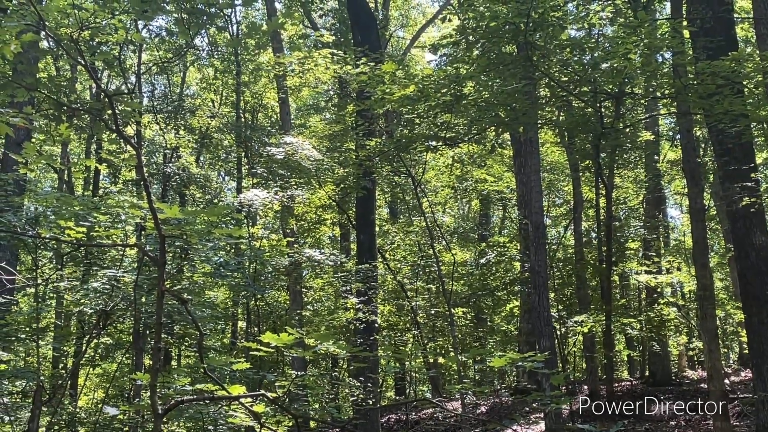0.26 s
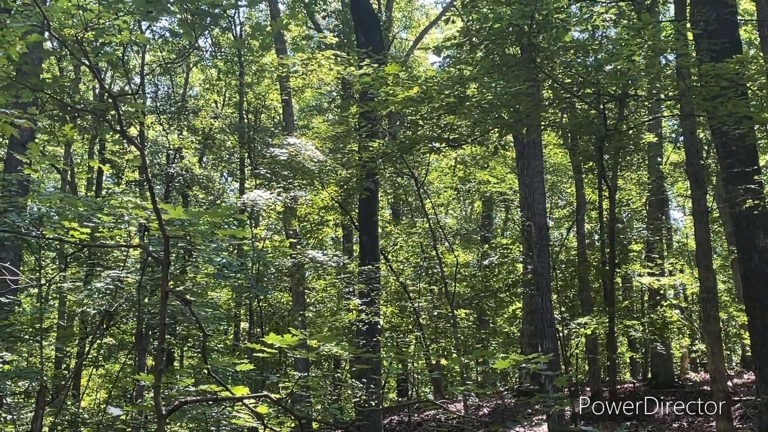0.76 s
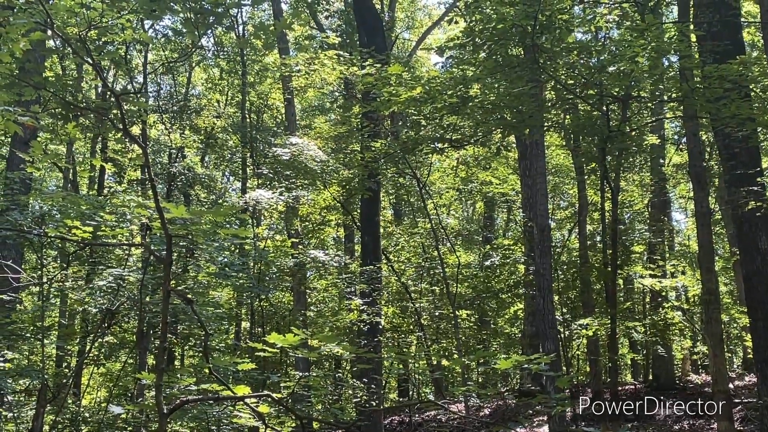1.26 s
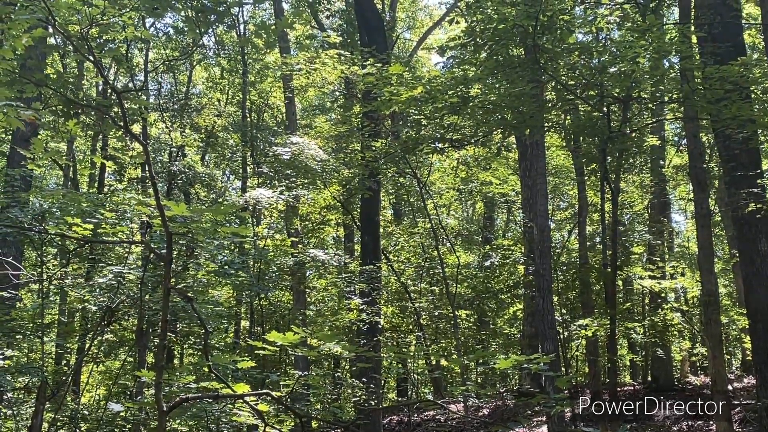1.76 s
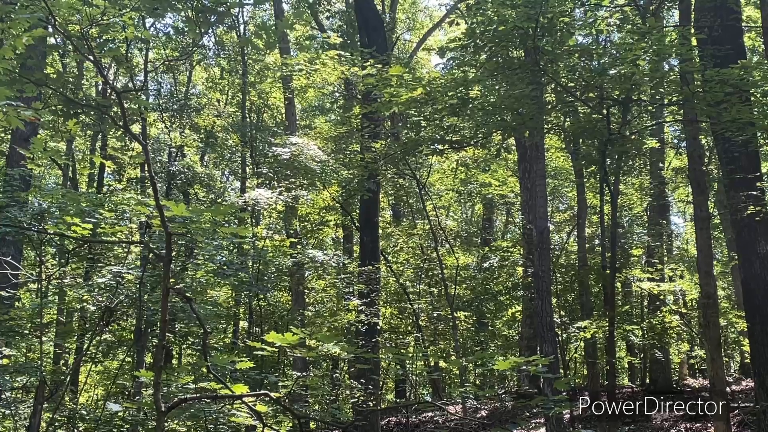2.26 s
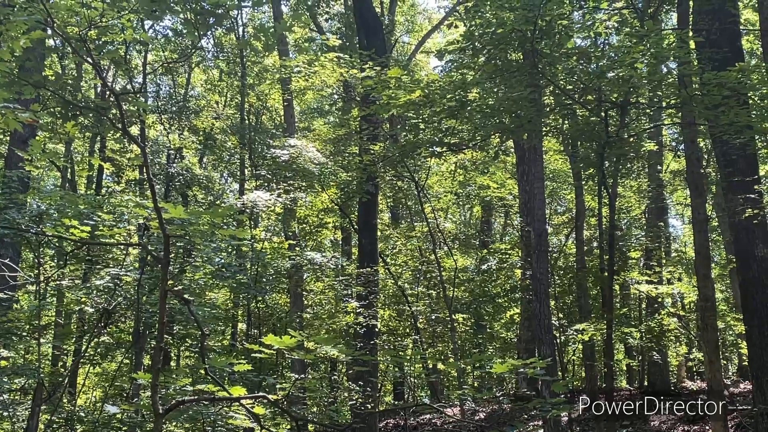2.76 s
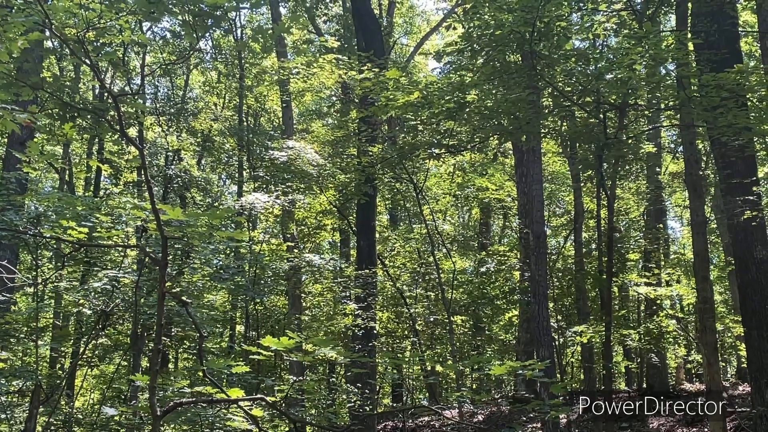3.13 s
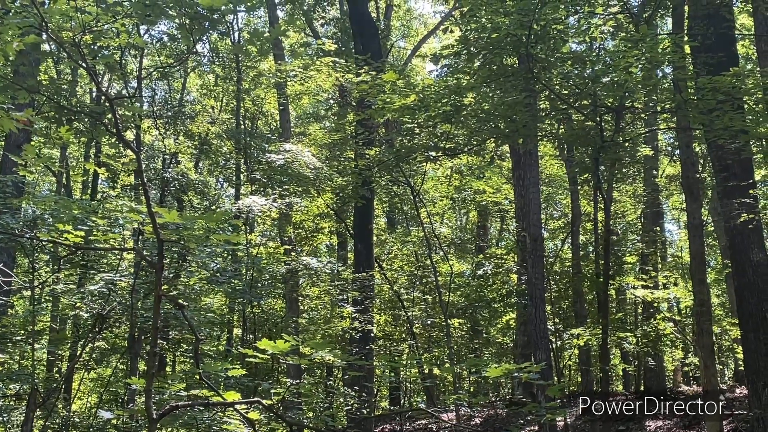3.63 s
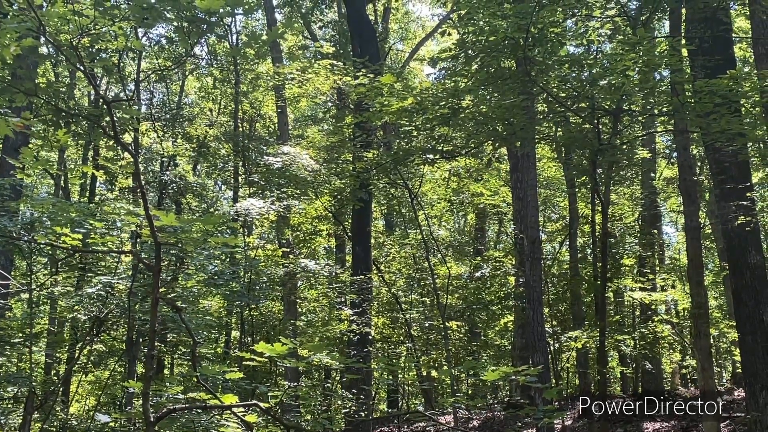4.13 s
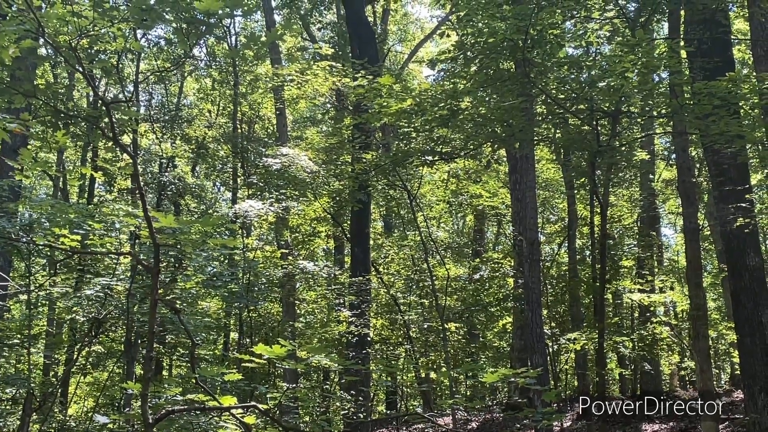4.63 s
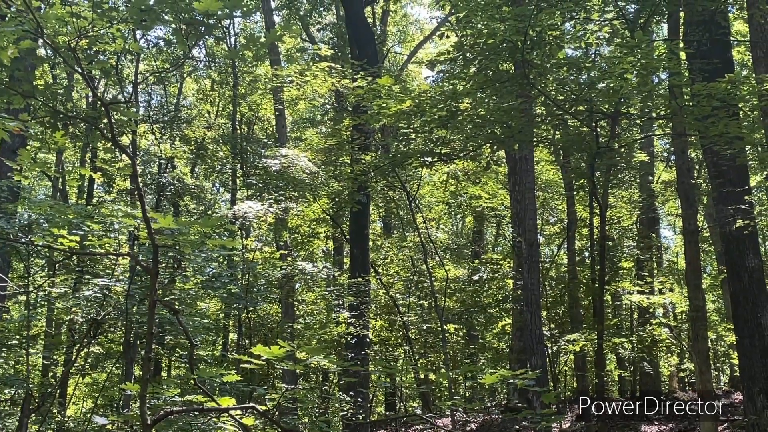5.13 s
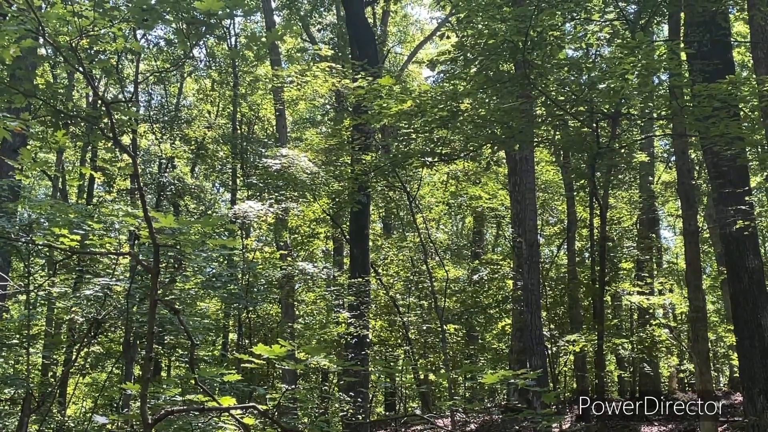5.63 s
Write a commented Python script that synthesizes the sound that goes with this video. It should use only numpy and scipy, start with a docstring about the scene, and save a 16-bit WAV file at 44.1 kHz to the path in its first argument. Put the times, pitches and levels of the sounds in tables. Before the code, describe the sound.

A hawk gives a harsh, bright scream trailing into a long hoarse whistle in an echoing wood, then starts a second, over faint insects.

```python
"""Hawk in an echoing wood

A hawk screams twice: partials and shaped noise give a harsh, bright attack, then a long hoarse whistle; the
second scream is cut off just as it settles. The end of another raspy call, noise with a few gliding tones,
fades at the start, and later gliding sines are small birds whistling. Noise bands make faint insects, a low
rumble and thin hiss, with a hum; short pulses are small things dropping. Noise echoes scatter birds and drops."""
import sys
import numpy as np
from scipy import signal
from scipy.fft import rfft, irfft, next_fast_len
from scipy.io import wavfile
from scipy.ndimage import map_coordinates

SR = 44100
rng = np.random.default_rng(int(sys.argv[2]) if len(sys.argv) > 2 else 0)


def to_wav(sig):
    """Store sig (one row per channel, or 1-D mono) as 16-bit WAV at the path in sys.argv[1].

    Samples outside -1..1 are clipped; the rate is SR.
    """
    pcm = np.clip(np.atleast_2d(sig), -1, 1) * 32767
    pcm = np.round(pcm).astype(np.int16)
    wavfile.write(sys.argv[1], SR, pcm.T)  # frames by channels


N = 259548  # samples


def amp(db):
    """Logarithmic level: decibels become an amplitude ratio, 20 dB to a factor of ten."""
    return 10 ** (np.asarray(db) / 20)


def unit(x):
    """Normalisation by power: scale to rms 1."""
    return x / np.sqrt(np.mean(x ** 2) + 1e-20)


def along(points, hz):
    """Logarithmic frequency scale: interpolate (Hz, value) points over log frequency."""
    f, v = np.transpose(points)
    return np.interp(np.log(hz + 1), np.log(f + 1), v)


def curves(rows):
    """Piecewise-linear envelopes: one value per sample for each column after the time."""
    s, *cols = np.transpose(rows)
    return [np.interp(np.arange(N) / SR, s, c) for c in cols]


def ramp(t, length):
    """Linear transition: 0 before time zero, rising to 1 over length."""
    return np.clip(t / length, 0, 1)


def wobble(rate):
    """Band-limited random modulation: a smooth curve through rate random knots a second."""
    knots = rng.standard_normal(int(N * rate / SR) + 4)
    return map_coordinates(knots, [np.arange(N) * rate / SR])


def filtered(x, response):
    """Linear filtering: multiply the spectrum of x by a response of frequency."""
    m = next_fast_len(N + SR // 2)  # padded, so that little wraps round
    spectrum = rfft(x, m) * response(np.fft.rfftfreq(m, 1 / SR))
    return irfft(spectrum, m)[..., :N]


def noise(spectrum):
    """Spectral shaping: white noise coloured by (Hz, dB) points, of rms 1."""
    white = rng.standard_normal(N)
    return unit(filtered(white, lambda hz: amp(along(spectrum, hz))))


def wide(spectrum, side_db):
    """Partial coherence: noise common to both channels plus independent noise of opposite sign in each."""
    common = noise(spectrum)
    opposed = noise(spectrum) * np.array([[1], [-1]])
    return common + amp(side_db) * opposed


def phase_of(hz):
    """Frequency modulation: phase is the running integral of frequency."""
    return 2 * np.pi * np.cumsum(hz) / SR


def background(rumble_db=-53.0, hum_hz=118, hum_db=-64, air_db=-87):
    """Incoherent sources merge into steady noise: insects that ebb, then swell at the end, rumble and hiss."""
    # Course of the insect hiss. Each row: time in seconds, mean level in dB.
    insect_levels = [(0, -57.5), (.7, -57), (2.6, -65), (3.3, -65), (3.8, -67.5), (4.3, -70), (4.8, -81.5),
                     (5.5, -92), (5.89, -63)]
    # Spectra of insect chorus, rumble and thin hiss. Each row: frequency in Hz, relative density in dB.
    chorus = [(1060, -17), (1800, -13), (2520, -6), (3150, 4), (3510, 0.5), (4210, -3), (4940, -4),
              (5730, 1), (6600, -7.5), (7660, -11), (8250, -68), (9000, -29), (11700, -37), (19800, -120)]
    rumble_spectrum = [(13, -39), (22, -34), (45, -9.5), (70, -2.5), (100, -6.5), (127, -12.5), (163, -19),
                       (196, -20), (352, -28), (395, -31.5), (459, -33.5), (560, -38), (800, -40.5),
                       (1480, -49.5), (2000, -50), (2600, -54.5), (4400, -120)]
    air = [(1000, 15.5), (5000, -36), (9500, 3.5), (13000, -3.5)]

    level_db, = curves(insect_levels)
    insects = amp(level_db + 0.82 * wobble(12)) * wide(chorus, side_db=-21.5)
    rumble = amp(rumble_db + 1.64 * wobble(12)) * wide(rumble_spectrum, side_db=-9.0)
    hum_phase = phase_of(hum_hz * (1 + 0.0147 * wobble(5.6)))
    hum = amp(hum_db + 1.7 * wobble(3.5)) * np.sqrt(2) * np.sin(hum_phase)
    return insects + rumble + hum + amp(air_db) * wide(air, side_db=-2)


def other_call(level_db=-58, end_s=0.19, fade_db_per_s=204, flutter_db=2):
    """Turbulent, pitchless voicing: the hoarse end of a farther call dies away exponentially after end_s."""
    # Spectrum of the rasp. Each row: frequency in Hz, relative density in dB.
    other_rasp = [(600, -23.5), (1000, -20), (1200, -13), (1450, -28), (1700, -25.5), (2080, -12.5),
                  (2310, -3.5), (2710, -4), (3440, -12), (4040, -34), (4510, -30), (6310, -21.5),
                  (7720, -23.5), (8110, -29), (8390, -82), (9000, -33.5), (11700, -73), (19800, -120)]
    fade_db = fade_db_per_s * np.maximum(np.arange(N) / SR - end_s, 0)
    return noise(other_rasp) * amp(level_db - fade_db + flutter_db * wobble(51.0))


def gliding_tones(notes, jitter):
    """Pure tones: each sine glides through two pitches or arches through three, swelling and fading."""
    t, out = np.arange(N) / SR, np.zeros(N)
    unsteady = 1 + jitter * wobble(400)
    for s, length, *pitches, db in notes:
        on = (t > s) & (t < s + length)
        u = (t[on] - s) / length  # progress through the note, 0 to 1
        knots = np.linspace(0, 1, len(pitches))
        glide = np.polyfit(knots, pitches, len(pitches) - 1)  # line or parabola through the pitches
        hz = np.polyval(glide, u)
        swell = np.sqrt(2 * np.abs(np.sin(np.pi * u)))
        out[on] += amp(db) * swell * np.sin(phase_of(hz * unsteady[on]))
    return out


def gesture(rows, harsh_s=0.2275, settle_s=.055):
    """Source control: pitch and levels follow a course as a harsh attack gives way to a held note."""
    t = np.arange(N) / SR
    start, end = rows[0][0], rows[-1][0]
    hz, tone_db, rasp_db, treble_db = curves(rows)
    sounding = (t > start) & (t < end)
    harsh = 1 - ramp(t - start - harsh_s, settle_s)
    return hz, harsh, sounding * amp(tone_db), sounding * amp(rasp_db), treble_db


def catches():
    """Source-resonance coupling: as each catch lowers the pitch, its octave meets the throat's resonance."""
    # Catches in the held note. Each row: centre in seconds, 1/e half width in seconds,
    # pitch dip in Hz, gain of the octave in dB.
    catch_points = [(1.718, .014, 99.8, 6), (1.805, .024, 90.4, 6.5), (1.925, .018, 110, 7.5),
                    (1.968, .018, 85.1, 5.5), (2.071, 0.0161, 94.9, 5.5), (2.421, .014, 120, 8.5)]
    t = np.arange(N) / SR
    s, width, dip_hz, db = np.transpose(catch_points)
    bumps = np.exp(-((t[:, None] - s) / width) ** 2)
    return bumps @ dip_hz, bumps @ db


def strand(start, rows, jitter=0.0244):
    """Random frequency modulation roughens a tone that glides through the attack of a scream."""
    hz, db = curves([(start + s, f, level) for s, f, level in rows])
    after = np.arange(N) / SR - start
    sounding = (after > rows[0][0]) & (after < rows[-1][0])
    return sounding * amp(db) * np.sin(phase_of(hz * (1 + jitter * wobble(700))))


def scream(rows, waver=0.01307, harsh_waver=0.00909, jitter=0.02408, harsh_jitter=-0.0036,
           second_hz=2550, second_db=-6, second_waver=.025, second_jitter=0.02806,
           shudder_db=1.85, flutter_db=0.54):
    """Source and filter: two sides of a syrinx sound through the throat, with turbulent rasp added."""
    # Partials of the voice. Each row: multiple of the pitch, relative amplitude in dB when harsh, then when
    # settled. The half-steps 2.5 and 3.5 are strongest when harsh; 1.5 is a little stronger when settled.
    partials = [(1, -33, -3.5), (1.5, -25, -20), (2, -1.5, -1.5), (2.5, -10.5, -25), (3, -7.5, -21),
                (3.5, -11, -38), (4, -21, -10), (5, -22.5, -22)]
    # Spectra of the throat's rasp. Each row: frequency in Hz, relative density in dB.
    rasp_harsh = [(500, -24), (1200, -21), (1900, -29.5), (2500, -1.5), (3000, 2.5), (3700, -5),
                  (4500, -6.5), (5500, -3.5), (6200, -10.5), (7000, -10.5), (8000, -11.5), (9800, -18),
                  (12500, -34), (14000, -46)]
    rasp_settled = [(500, -20.5), (1100, -24.5), (1300, -12), (1440, -6), (1600, -14.5), (1750, -30),
                    (1950, -10.5), (2200, -13), (2550, -2.5), (2950, -11), (3250, -14), (4800, -17.5),
                    (6000, -13.5), (7100, -19), (8200, -27), (10200, -34.5), (12000, -56.5)]
    # The throat's colouring of the tones. Each row: frequency in Hz, gain in dB.
    throat = [(800, -36), (1250, -0.5), (1450, -.5), (1540, -3), (1730, -18), (1930, 1), (2200, -9),
              (2560, 2), (2660, 2), (2790, -5), (2950, 1), (3700, -1.5), (5500, -2), (7000, -9)]
    # Rough strands in the attack: one arches over it, one slides down to the held pitch.
    # Each row: time after the start in seconds, pitch in Hz, amplitude in dB relative to the rasp gain.
    arch = [(.01, 2450, -27), (.035, 3280, -4.5), (0.054, 3670, -6.5), (.095, 3750, -14),
            (.128, 3380, -1.5), (.155, 3130, -9), (.18, 2860, -25)]
    slide = [(.14, 2501, -20), (.17, 2300, -12), (.2, 2050, -14), (.228, 1903, -12), (.255, 1600, -17),
             (.28, 1485, -11.5), (.3, 1480, -25)]

    hz, harsh, tone_gain, rasp_gain, treble_db = gesture(rows)
    settled = 1 - harsh
    dip_hz, lift_db = catches()
    slow = (settled * waver + harsh * harsh_waver) * wobble(130)
    fast = (jitter + harsh * harsh_jitter) * wobble(700)
    phase = phase_of((hz - dip_hz) * (1 + slow + fast))

    tones = 0
    for k, hard, soft in partials:
        balance = harsh * amp(hard) + settled * amp(soft)
        flicker = amp(1.0 * wobble(120) + lift_db * (k == 2))  # separate for each partial
        tones = tones + balance * flicker * np.sin(k * phase)

    # the other side of the syrinx, in the held note
    second_unsteady = second_waver * wobble(90) + second_jitter * wobble(700)
    second = np.sin(phase_of(second_hz * (1 + second_unsteady)))
    second_gain = rasp_gain * settled * amp(second_db + 1.5 * wobble(60))
    tones = filtered(tone_gain * tones + second_gain * second, lambda f: amp(along(throat, f)))
    start = rows[0][0]
    tones = tones + rasp_gain * (strand(start, arch) + strand(start, slide))

    rasp = harsh * noise(rasp_harsh) + settled * amp(-2) * noise(rasp_settled)
    pulse = 1 + 0.28 * np.sin(phase / 2)  # at half the pitch
    shudder = unit(amp(shudder_db * wobble(450)) * pulse)
    voice = np.sqrt(2) * tones + rasp_gain * rasp * shudder
    # the moving treble gain acts above about 3450 Hz
    treble = filtered(voice, lambda f: 1 - 1 / (1 + (f / 3450) ** 12))
    return (voice + treble * (amp(treble_db) - 1)) * amp(flutter_db * wobble(70))


def taps():
    """Heavily damped impact: each dull contact is a few cycles at most under a Gaussian envelope."""
    # Small things dropping. Each row: time in seconds, peak level in dB before the wood's gain,
    # pitch in Hz, 1/e half width in seconds.
    contacts = [(2.121, -43.5, 654, .0012), (2.756, -53.5, 497, 0.0051), (2.751, -58.5, 880, 0.002),
                (3.918, -51, 475, 0.0042), (4.1176, -52, 1213, 0.0011), (4.1177, -47, 2250, 0.00057),
                (4.122, -44, 5300, 0.000085), (4.918, -61, 850, 0.0011), (5.2578, -34, 720, 0.0014)]
    t = np.arange(N) / SR
    out = np.zeros(N)
    for s, db, hz, width in contacts:
        envelope = np.exp(-((t - s) / width) ** 2)
        out += amp(db) * envelope * np.cos(2 * np.pi * hz * (t - s))
    return out


def forest(x, direct_db, early_db, wet_db, early_t60=0.14, side_db=-14):
    """Scattering and reverberation: trunks give a quick spray of echoes, then a frequency-dependent tail."""
    # Decay of the tail. Each row: frequency in Hz, time in seconds to fall by 60 dB.
    decay_times = [(300, 0.71), (1400, 0.81), (2500, 0.93), (3700, 1.06), (5500, 0.81), (11000, 0.6)]
    hz, t, z = signal.stft(rng.standard_normal((2, 2, SR)), SR, nperseg=256)
    early = signal.istft(z[0] * amp(-60 * t / early_t60), SR, nperseg=256)[1]
    late_decay = amp(-60 * t / along(decay_times, hz)[:, None])
    late = signal.istft(z[1] * late_decay, SR, nperseg=256)[1]
    # each scaled so that its middle response has unit energy
    echoes = amp(early_db) * early / np.linalg.norm(early[0])
    echoes = echoes + amp(wet_db) * late / np.linalg.norm(late[0])
    mid, side = signal.fftconvolve(x[None], echoes, axes=1)[:, :N]
    return amp(direct_db) * x + mid + amp(side_db) * side * np.array([[1], [-1]])


def scene():
    """Superposition: birds with differing direct-to-reverberant ratios, drops and background add linearly."""
    # Course of each scream. Each row: time in seconds, pitch in Hz before dips and wavering,
    # tone gain in dB, rasp gain in dB, treble gain in dB.
    scream_courses = [
        [(.824, 1150, -64.5, -57, 3), (.843, 1250, -49, -43, -3), (.872, 1400, -43.5, -39.5, 1.5),
         (.912, 1468, -36.5, -41.5, 2.5), (.936, 1450, -44, -40, -0.5), (.95, 1285, -35, -43, -3),
         (.972, 1265, -43, -42.5, -2.5), (.996, 1240, -63, -46, -3), (1.034, 1280, -41, -41, -12),
         (1.06, 1330, -59, -47, -3.5), (1.1, 1505, -54.5, -50.5, 6), (1.18, 1485, -51, -52, 4.5),
         (1.3, 1462, -51.5, -47, -3), (1.7, 1450, -51.5, -51.5, -0.5), (2.1, 1415, -52.5, -52.5, -1.5),
         (2.41, 1395, -58.5, -51, -9), (2.47, 1350, -78, -62, -4)],
        [(5.6, 1150, -80, -72, -4), (5.621, 1270, -47.5, -44.5, -9), (5.636, 1360, -51, -46.5, -3),
         (5.654, 1440, -43, -45, -2.5), (5.672, 1475, -38, -46, 0), (5.705, 1570, -42.5, -43.5, -1),
         (5.726, 1495, -40.5, -45, -2), (5.746, 1310, -40.5, -48, -4.5), (5.768, 1270, -42, -43, -5.5),
         (5.798, 1250, -48, -46.5, -6), (5.834, 1310, -44, -42.5, -10), (5.862, 1500, -52, -49, 0),
         (5.89, 1490, -56, -52, -3)],
    ]
    # Gliding tones from afar. The rows starting before 0.3 s are the tonal lines in the fading end of the other
    # call; the rest are whistles deep in the wood. Each row: start in seconds, length in seconds, start pitch
    # in Hz, end pitch in Hz, level in dB before the wood's gain.
    far_notes = [(-.02, 0.137, 2796, 2740, -46.5), (-.02, .13, 2280, 2323, -54),
                 (.115, .16, 2380, 2355, -48.5), (.05, .067, 3740, 3790, -54),
                 (.115, .085, 3930, 3953, -48), (.2, 0.075, 4030, 4050, -54.5),
                 (.27, .035, 2800, 2620, -44.5), (.275, 0.037, 2330, 1957, -56.5),
                 (.54, 0.15, 5100, 5080, -60.5), (.758, .048, 3830, 3680, -55),
                 (2.81, .06, 3800, 3710, -57.5), (2.865, 0.037, 3700, 3000, -51.5),
                 (2.897, 0.041, 3080, 2720, -56.5), (2.935, .045, 2737, 2680, -57),
                 (2.98, 0.059, 2180, 1920, -67), (3.52, .054, 6700, 6500, -64.5),
                 (3.67, .13, 2836, 2350, -70.5), (5.14, 0.073, 2425, 3150, -68),
                 (5.17, 0.074, 5750, 5250, -61), (5.23, .15, 3200, 3850, -62.5),
                 (5.44, 0.095, 7200, 6750, -75)]
    # A songbird close by. Each row: start in seconds, length in seconds, start, middle and end pitch in Hz,
    # level in dB before the wood's gain.
    near_notes = [(4.972, 0.039, 2440, 3950, 4590, -59.5), (5.008, 0.033, 4600, 4170, 2750, -56),
                  (5.051, 0.014, 2780, 3570, 5000, -56), (5.062, .016, 4930, 4380, 3270, -52.5),
                  (5.134, .044, 4850, 5260, 5610, -61), (5.174, .011, 5700, 5330, 4250, -56.5),
                  (5.216, 0.011, 4360, 3155, 2240, -53.5)]

    other = forest(other_call(), direct_db=3.5, early_db=4.0, wet_db=-2.5)
    far = forest(gliding_tones(far_notes, jitter=.013), direct_db=-7, early_db=-10, wet_db=-2)
    screams = sum(scream(rows) for rows in scream_courses)
    hawk = forest(screams, direct_db=0, early_db=-6, wet_db=-6.5)
    drops = forest(taps(), direct_db=0.5, early_db=-13, wet_db=-22)
    near = forest(gliding_tones(near_notes, jitter=0.0047), direct_db=2, early_db=-16, wet_db=-7)
    left_lean = amp([[.3], [-.3]])  # slightly louder on the left
    return (hawk + other + far) * left_lean + near + drops + background()


def record(dry, top_hz=13700):
    """Interchannel phase: two microphone ports hear each frequency out of step; nothing passes top_hz."""
    # Phase between the ports. Each row: frequency in Hz, lead of the left port in radians.
    port_leads = [(1500, 0.29), (3100, 0.44), (3700, -0.5), (6200, -0.75), (7200, -1.73), (8000, -3),
                  (10200, -5), (13000, -7.5)]
    opposite = np.array([[1], [-1]])  # half the lead to each side
    ports = filtered(dry, lambda hz: np.exp(.5j * along(port_leads, hz) * opposite))
    return filtered(ports, lambda hz: hz < top_hz)


dry = scene()
out = record(dry)
to_wav(out)
```